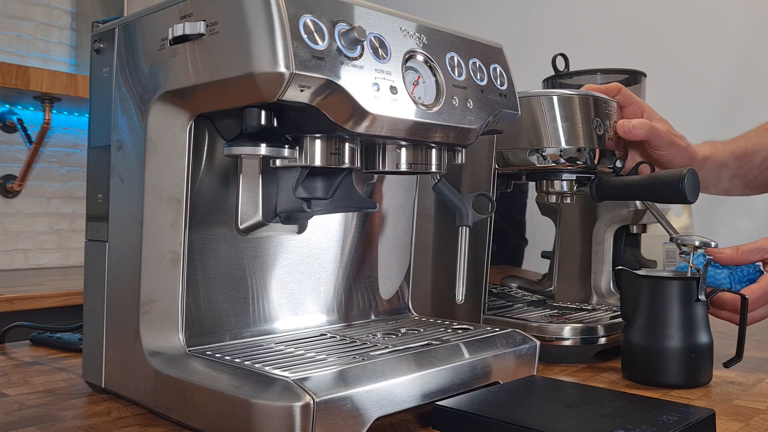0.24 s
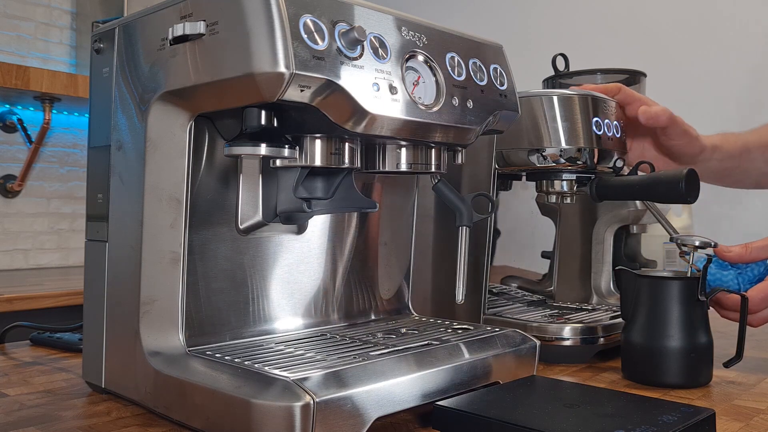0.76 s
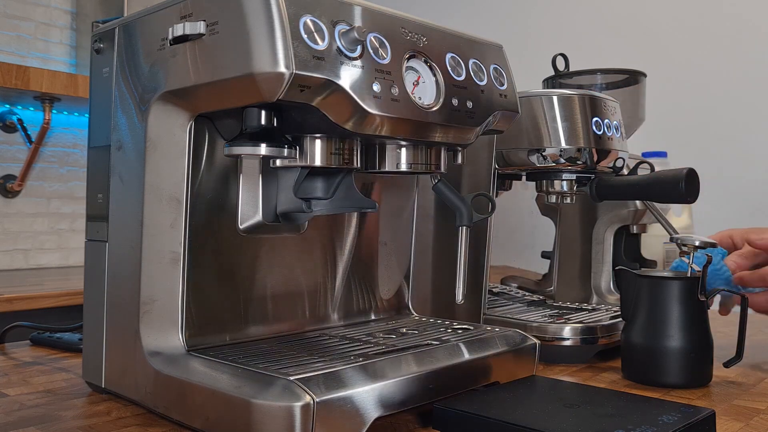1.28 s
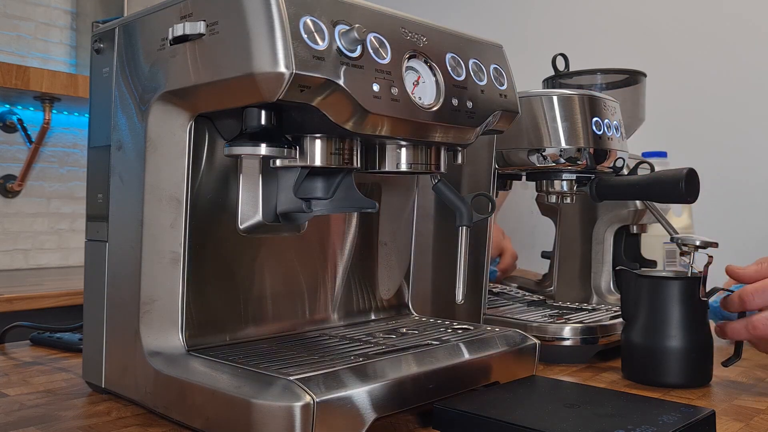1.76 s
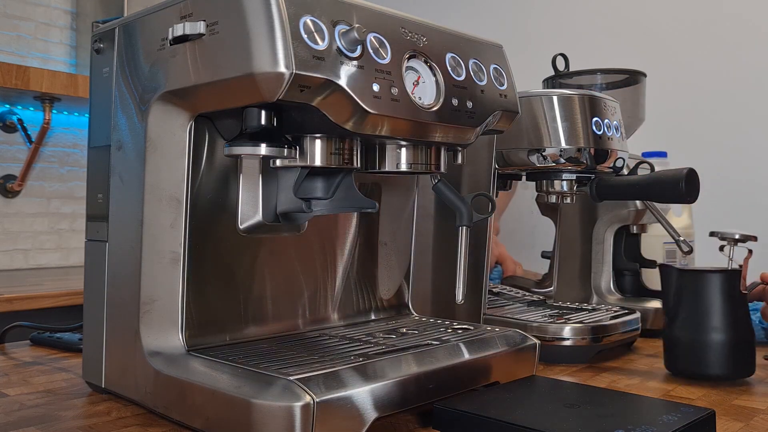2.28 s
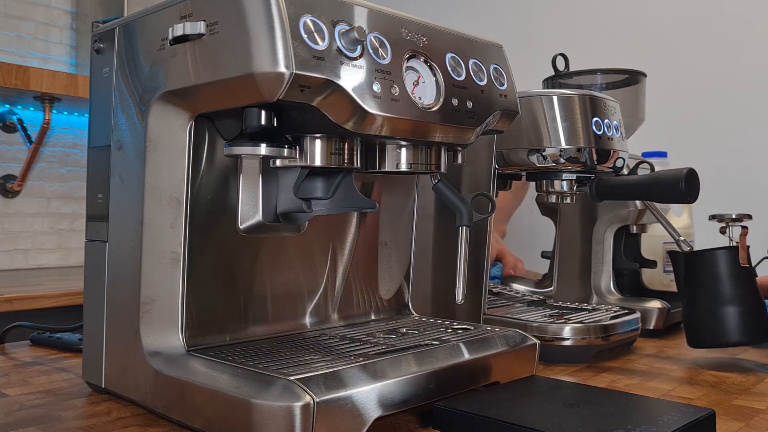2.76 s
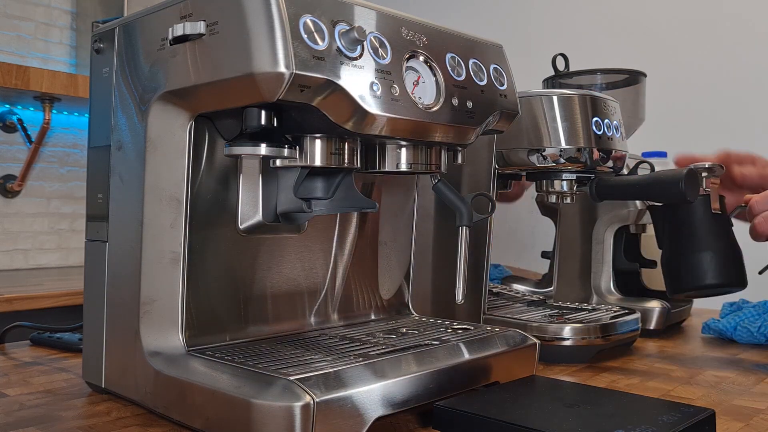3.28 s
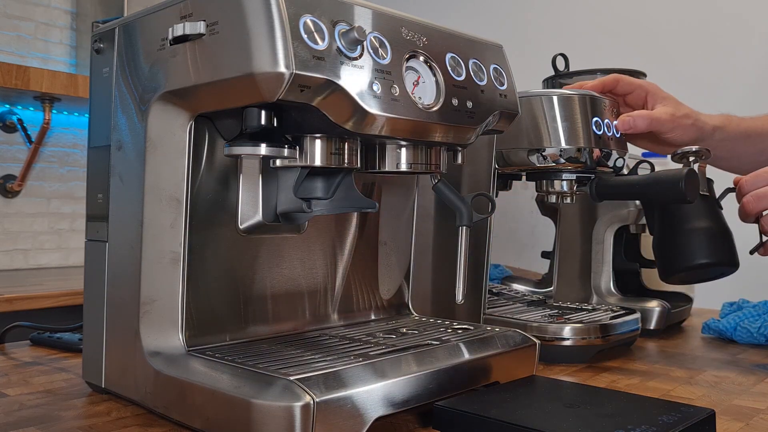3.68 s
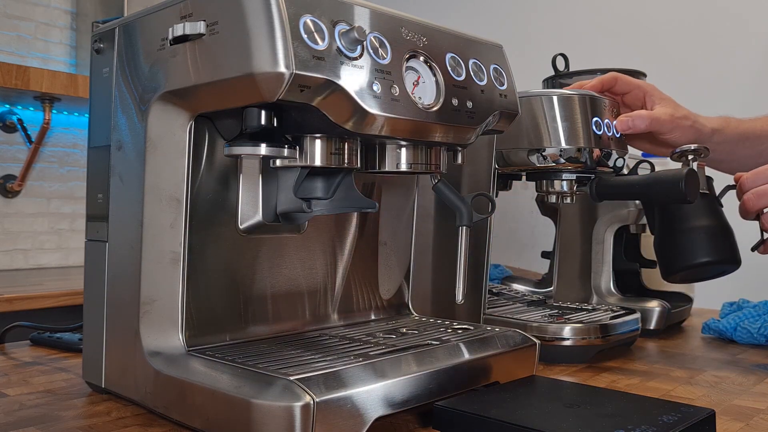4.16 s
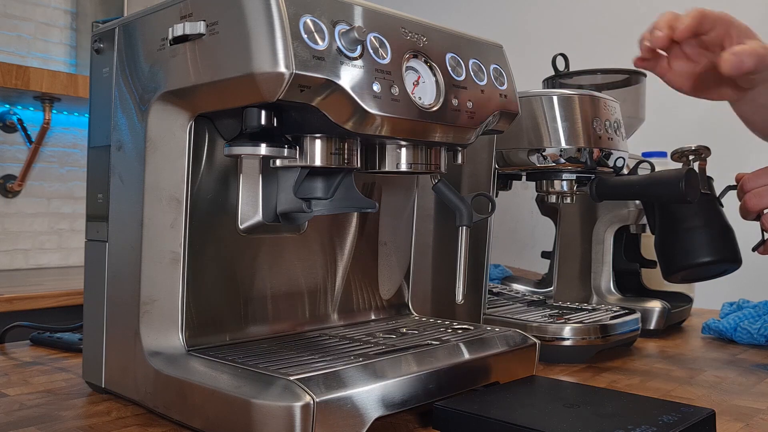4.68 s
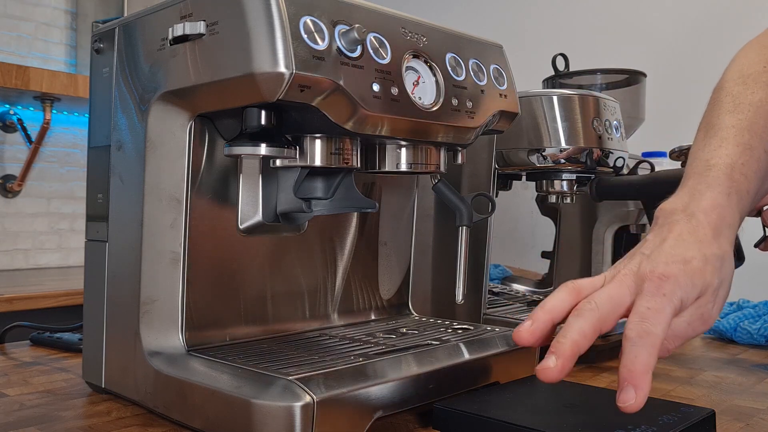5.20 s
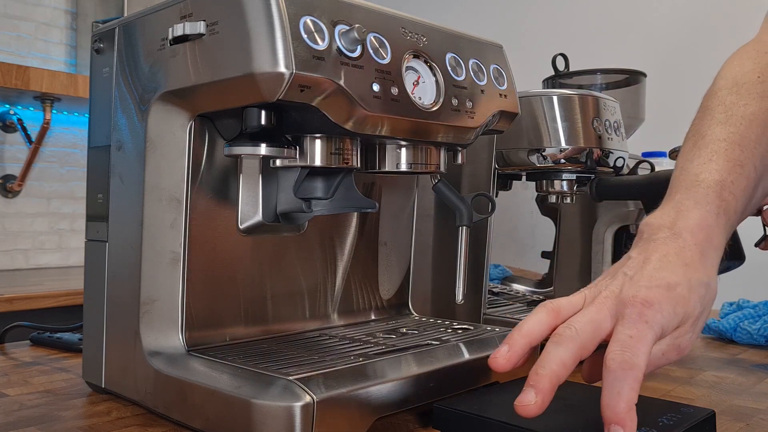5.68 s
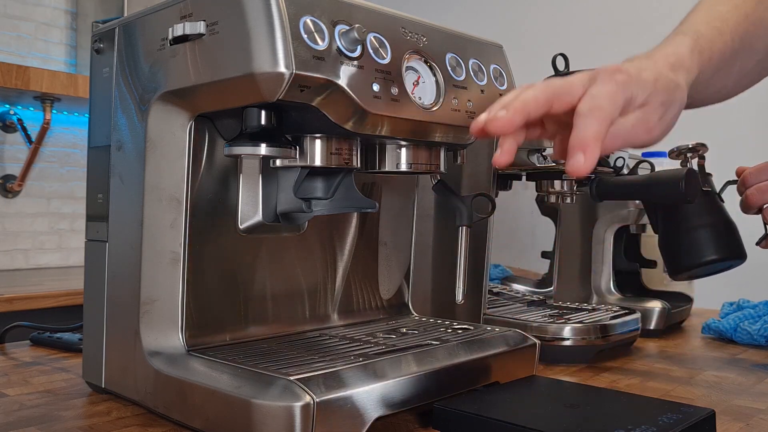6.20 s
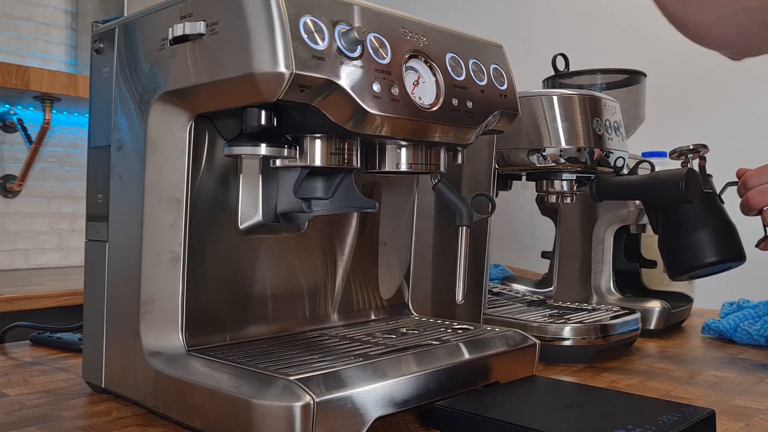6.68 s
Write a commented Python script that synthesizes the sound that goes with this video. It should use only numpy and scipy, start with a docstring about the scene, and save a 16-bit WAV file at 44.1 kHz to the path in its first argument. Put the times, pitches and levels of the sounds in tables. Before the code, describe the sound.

Close stereo sound in a small, short-echoed kitchen, source a little right of centre, over faint low room noise. From 0 s a steam wand hisses into the open, bright and fizzy with a breathy lower rush, sputtering slightly. A firm dull knock hits the wooden counter at 0.6 s; softer bumps follow between 1.1 and 2.2 s. The steam thins steadily from about 1.7 s. A steel jug clinks against the wand at 2.74 s and more faintly at 3.0 s, with a weak hollow tone emerging. Near 3.3 s the hiss is almost gone; at 3.4-3.5 s it spurts back, sliding down and whistling. Inside the jug it stays strong, with a fluttering hoot near 950 Hz, gurgle and overtone flares, the hoot strongest near 4.6 s and weaker after 6.3 s. Dull knocks land at 4.65, 5.73 and 6.8 s. Fizz brightens towards the abrupt end, about 6.9 s.

```python
"""A steam wand hisses into the open and dies down while a steel milk jug is lifted and clinks against it.
The steam returns with a spurt inside the jug, whose hollow sings near 950 Hz; whistles and breaths move in it.
Dull handling knocks sound through the wooden counter of a small kitchen, over faint low noise.
Steam, whistles and hollow are shaped noise; knocks are noise through resonances; clinks are decaying
sine modes plus noise bursts; the hardest contacts are short pulses with a brief modal ring."""
import sys
import numpy as np
from scipy import signal
from scipy.fft import rfft, irfft, next_fast_len
from scipy.io import wavfile
from scipy.ndimage import uniform_filter1d, map_coordinates

SR = 44100
rng = np.random.default_rng(int(sys.argv[2]) if len(sys.argv) > 2 else 0)


def dump(signal):
    """Clip the signal to [-1, 1] and save it as 16-bit WAV at the path in sys.argv[1]."""
    limited = np.clip(np.atleast_2d(signal).T, -1, 1)
    pcm = np.round(limited * 32767).astype(np.int16)
    wavfile.write(sys.argv[1], SR, pcm)


N = 306054


def amp(db):
    """Decibels to gain."""
    return 10 ** (np.asarray(db) / 20)


def unit(x):
    """x at rms 1."""
    return x / np.sqrt(np.mean(x ** 2) + 1e-20)


def along(points, hz):
    """(Hz, value) points interpolated on a log-frequency axis."""
    point_hz, value = np.transpose(points)
    return np.interp(np.log(hz + 1), np.log(point_hz + 1), value)


def clock():
    """Time of every sample in seconds."""
    return np.arange(N) / SR


def curves(rows):
    """One value per sample for each column after the time."""
    time_s, *columns = np.transpose(rows)
    return [np.interp(clock(), time_s, column) for column in columns]


def during(rows):
    """1 over the span of a table, with 25 ms fades outside it."""
    outside_s = np.maximum(rows[0][0] - clock(), clock() - rows[-1][0])
    return np.clip(1 - outside_s / 0.025, 0, 1)


def swell(crest_s, half_s):
    """Smooth bump of height 1 at crest_s, down to 1/e at half_s either side."""
    return np.exp(-((clock() - crest_s) / half_s) ** 2)


def wobble(rate_hz, size=N):
    """Smooth random curve with rate_hz knots a second."""
    knots = rng.standard_normal(int(size * rate_hz / SR) + 4)
    return map_coordinates(knots, [np.arange(size) / SR * rate_hz])


def filtered(x, response):
    """x filtered by a response given as a function of frequency in Hz."""
    size = next_fast_len(N + SR // 2)
    return irfft(rfft(x, size) * response(np.fft.rfftfreq(size, 1 / SR)), size)[..., :N]


def noise(spectrum):
    """Noise of rms 1 with the given colour."""
    return unit(filtered(rng.standard_normal(N), lambda hz: amp(along(spectrum, hz))))


def resonances(modes, hz):
    """Complex sum of (Hz, width Hz, dB) resonances with alternating sign."""
    total = 0
    for k, (mode_hz, width_hz, level_db) in enumerate(modes):
        damping = 1j * hz * width_hz
        total = total + (-1) ** k * amp(level_db) * damping / (mode_hz ** 2 - hz ** 2 + damping)
    return total


def mode_power(modes, hz):
    """Summed power of resonances, without interference between them."""
    return sum(abs(resonances([mode], hz)) ** 2 for mode in modes)


def band(hz, low_hz, high_hz, order):
    """Band-pass gain with smooth edges."""
    low_edge = 1 + (low_hz / (hz + 1)) ** (2 * order)
    high_edge = 1 + (hz / high_hz) ** (2 * order)
    return 1 / np.sqrt(low_edge * high_edge)


def plume(spectrum, near_db, loose):
    """Spread-out jet: a compact core, plus eddies that reach each channel on their own."""
    core = kitchen(noise(spectrum), near_db=near_db, tail_db=-2)
    return core + loose * np.array([noise(spectrum), noise(spectrum)])


# colour of the jet in the open: hz, level_db (dB per Hz)
OPEN_COLOUR = [(500, -26), (1000, -16), (1500, -16.5), (2000, -10.5), (2800, -5.5), (4200, -3),
               (5100, -5.5), (6800, -4.5), (7700, 1.5), (9500, -4), (11300, 0), (13400, 2), (14300, 2),
               (15100, -25)]


def open_jet():
    """Free turbulence of the steam outside the jug."""
    return plume(OPEN_COLOUR, near_db=-8, loose=0.7)


# depth of the random uneven gain: hz, depth_db
PATCH_DEPTH = [(1000, 2), (2500, 1.8), (4300, 4), (8000, 1.6), (13000, 2.3)]


def patchy(x):
    """Random uneven gain over frequency and time, in patches about 170 Hz by 50 ms."""
    cells = signal.stft(x, nperseg=512)[2]
    field = rng.standard_normal(cells.shape[1:])
    field = uniform_filter1d(field, size=2, axis=0)
    field = uniform_filter1d(field, size=9, axis=1)
    depth_db = along(PATCH_DEPTH, np.fft.rfftfreq(512, 1 / SR))[:, None]
    return signal.istft(cells * amp(depth_db * unit(field)), nperseg=512)[1][:, :N]


# colour of the jet in the jug: hz, level_db (dB per Hz)
ENCLOSED_COLOUR = [(600, -23), (1000, -53), (1400, -5.5), (2000, -1), (3000, 0), (4500, -5), (5200, -7.5),
                   (6400, -6), (6800, -6), (7600, 0.5), (8600, -5.5), (9400, -1.5), (10200, -2.5),
                   (11200, 2.5), (12700, 7), (14200, 5), (15000, -16)]
# narrow jug resonances: hz, width_hz, level_db (against the plain hiss)
WALL_MODES = [(2335, 60, 2), (2640, 63, 0), (3120, 110, -1), (3570, 40, 4), (4010, 71, 3), (4290, 20, -5),
              (4730, 70, 2), (5850, 79, 1), (6500, 60, 7), (7700, 100, -11), (8100, 50, 7), (8800, 40, -7),
              (8930, 120, 2.5), (11440, 80, -2)]


def enclosed_jet():
    """Steam inside the jug, coloured by narrow resonances."""
    stream = plume(ENCLOSED_COLOUR, near_db=-4, loose=0.7)
    return patchy(filtered(stream, lambda hz: np.sqrt(1 + mode_power(WALL_MODES, hz))))


# brief spurts of steam: crest_s, fizz_gain_db, half_s
STEAM_SPURTS = [(0.603, 1.5, 0.045), (0.872, 3.5, 0.068), (1.091, 5.5, .025), (1.38, 5, 0.086),
                (1.718, 4.5, 0.12), (2.706, 8.5, 0.028), (3.498, 14, 0.052), (3.99, 2, 0.077),
                (4.21, 3.5, 0.02), (4.83, 4, 0.045), (5.425, 2.5, 0.051), (5.9, 4.5, 0.044),
                (6.233, 4, 0.14), (6.64, 4.5, 0.04)]


def spurts_db():
    """Level lift in the fizz, in dB, as the steam spurts."""
    return sum(gain_db * swell(crest_s, half_s) for crest_s, gain_db, half_s in STEAM_SPURTS)


# three bands of the jet, before trims: time_s, fizz_db, hiss_db, rush_db
JET_LEVELS = [ (0, -36.5, -42.5, -48), (0.3, -37, -40, -45), (0.55, -32.5, -39.5, -43),
              (0.99, -35.5, -40, -41.5), (1.2, -35, -41.5, -47), (1.7, -39, -42, -51),
              (2.03, -37.5, -45, -51), (2.27, -39.5, -47, -51.5), (2.4, -41.5, -47.5, -53.5),
              (2.7, -45.5, -47.5, -52.5), (2.95, -46.5, -51.5, -54.5), (3.28, -53.5, -54.5, -56.5),
              (3.56, -39, -38.5, -43), (4.75, -37, -38.5, -46.5), (5.25, -38, -35, -44),
              (5.95, -32.5, -34, -44.5), (6.45, -36, -35, -48.5), (6.94, -28.5, -35, -48)]
# nozzle position: time_s, share (power share of the enclosed jet, 0-1)
INSIDE_JUG = [(0, 0), (2.6, 0.14), (3.1, 0.06), (3.6, 1), (6.94, 1)]
# lowest part of the rush: time_s, gain_db
RUSH_BOTTOM = [(2.2, 3.5), (2.42, -2.5), (2.8, 0), (2.96, -12), (3.04, 2.5), (3.4, -0.5)]
# large eddies of the free jet: hz, level_db (dB per Hz)
ROAR_COLOUR = [(120, -37), (250, -4), (500, -2.5), (900, 0), (1500, 2), (2500, 5), (5000, -36)]
SPURT_IN_HISS, SPURT_IN_RUSH = 0.55, 0.32  # share of a spurt's dB


def jet(roar_db=-56, roar_db_per_rush_db=1.58, roar_db_per_bottom_db=3.0):
    """Turbulent steam: fine nozzle fizz, hiss and a lower rush where it strikes something; spurts brighten it."""
    fizz_db, hiss_db, rush_db = curves(JET_LEVELS)
    spurt_db = spurts_db()
    inside = np.clip(curves(INSIDE_JUG)[0], 0, 1)
    bottom_db, = curves(RUSH_BOTTOM)
    both = np.array([open_jet(), enclosed_jet()])
    sputter_db = 0.5 * wobble(14) + 0.5 * wobble(60)  # droplets of condensate unsettle the flow

    def layer(low_hz, high_hz, level_db, pan_db):
        free, enclosed = filtered(both, lambda hz: band(hz, low_hz, high_hz, order=10))
        stream = np.sqrt(1 - inside) * unit(free) + np.sqrt(inside) * unit(enclosed)
        flutter_db = sputter_db + 0.73 * wobble(25)
        return stream * amp(level_db + flutter_db) * amp([[pan_db], [-pan_db]])  # positive pans left

    rush = layer(1110, 5000, level_db=rush_db + SPURT_IN_RUSH * spurt_db + 2.5, pan_db=0.58)
    # the lowest part of the rush follows its own level curve
    bottom = filtered(rush, lambda hz: band(hz, 20, 2450, order=8))
    rush = rush + bottom * (amp(bottom_db) - 1)
    hiss = layer(5340, 10040, level_db=hiss_db + SPURT_IN_HISS * spurt_db, pan_db=-0.06)
    fizz = layer(10700, 16000, level_db=fizz_db + spurt_db, pan_db=-1.2)
    # a strong free jet also sheds large, slow eddies
    eddy_db = roar_db + roar_db_per_rush_db * (rush_db + 42.5) + roar_db_per_bottom_db * bottom_db
    roar = kitchen(noise(ROAR_COLOUR), near_db=-3.5, tail_db=-9.0) * amp(eddy_db) * (1 - inside)
    return roar + rush + hiss + fizz


# drive of the jug's hollow, before trims: time_s, tone_db, gurgle_db
HOLLOW_LEVELS = [(2.58, -95, -79), (2.71, -61, -65), (2.88, -51, -59), (2.96, -64.5, -66),
                 (3.07, -43.5, -60), (3.36, -54, -57.5), (3.62, -43, -46), (4.45, -41, -46),
                 (4.62, -34, -47), (4.9, -37, -48.5), (5.2, -41, -46), (6.2, -41, -51), (6.42, -50, -64.5),
                 (6.94, -49, -62)]
# air resonances of the jug: hz, width_hz, level_db
TONE_MODES = [(933, 14.4, 10), (967, 9.9, 12), (1001.5, 5.8, 10.5), (1030, 10, -10), (1085.6, 11.6, 5.5),
              (1118, 23, -7), (880, 250, -4)]
# lower gurgling resonances: hz, width_hz, level_db
GURGLE_MODES = [(650, 490, -10.5), (625.5, 13, -1.5), (702, 10, -6.5), (796, 36, 4.5), (864, 15.4, 10)]
# overtone of the hollow: hz, width_hz, level_db
OVERTONE_MODES = [(1715, 10, 0)]
# moments when the overtone catches, before trims: crest_s, level_db
OVERTONE_FLARES = [(3.04, -57.5), (3.72, -44), (3.92, -47), (4.11, -47.5), (4.37, -51), (4.73, -67),
                   (5.28, -46), (5.37, -45), (5.67, -48), (5.87, -53), (6.03, -53), (6.17, -46), (6.4, -54),
                   (6.53, -51)]
FLARE_HALF_S, OVERTONE_DB = 0.057, -16  # OVERTONE_DB: against the tone, between flares


def hollow(slosh_depth_db=1.1, flicker_db=0.5, flutter_db=0.84):
    """The jet blows the air in the jug into a fluttering, hooting tone whose overtone flares now and then."""
    tone_db, gurgle_db = curves(HOLLOW_LEVELS)
    flares = sum(amp(level_db) * swell(crest_s, FLARE_HALF_S) for crest_s, level_db in OVERTONE_FLARES)
    overtone_gain = amp(tone_db + OVERTONE_DB) + flares
    slosh_db = slosh_depth_db * wobble(13) + flutter_db * wobble(45)

    def blown(modes, low_hz, high_hz, level_db):
        response = lambda hz: np.sqrt(mode_power(modes, hz)) * band(hz, low_hz, high_hz, order=8)
        mid, side = filtered(rng.standard_normal((2, N)), response)
        spread = 0.94
        stereo = np.array([mid + spread * side, mid - spread * side])
        return unit(stereo) * amp(level_db + slosh_db)

    tone = blown(TONE_MODES, 790, 1400, level_db=tone_db + 1.5) * amp([[-0.4], [0.4]])
    gurgle = blown(GURGLE_MODES, 614, 940, level_db=gurgle_db + 3.0) * amp([[1.5], [-1.5]])
    overtone = blown(OVERTONE_MODES, 1470, 2060, level_db=flicker_db * wobble(38) + 2.5) * overtone_gain
    return (tone + gurgle + overtone) * during(HOLLOW_LEVELS)


# moving noise bands in the steam, narrow whistles and broad breaths, one a row of points, before trims:
# time_s, centre_hz, width_hz, level_db
MOVING_BANDS = [
    [(0, 6540, 895, -48), (0.16, 7940, 1010, -41.5), (0.29, 8940, 1100, -46)],
    [(0.28, 6130, 1507, -50), (0.58, 5590, 1514, -48), (0.8, 3687, 2210, -51), (0.98, 3007, 2682, -42),
     (1.07, 2494, 2190, -55)],
    [(3.21, 4680, 450, -64), (3.28, 4110, 500, -54), (3.355, 3920, 701, -55), (3.38, 3200, 902, -51),
     (3.4, 2144, 605, -43.5), (3.445, 1875, 345, -56)],
    [(3.22, 6220, 600, -67), (3.36, 6130, 700, -56), (3.4, 5400, 1210, -52), (3.44, 5050, 895, -54)],
    [(3.48, 5710, 454, -43), (3.52, 5810, 385, -36.5), (3.56, 5800, 317, -43)],
    [(3.8, 5640, 603, -51), (4.35, 6010, 601, -45.5), (4.66, 6180, 600, -50)],
    [(4.9, 4730, 500, -64), (5.45, 4510, 900, -50.5), (6.2, 4695, 703, -52.5), (6.94, 4700, 499, -59.5)],
    [(3.6, 7980, 299, -58), (4.06, 7800, 281.6, -44), (5.1, 7880, 257.5, -48), (5.45, 7730, 380, -43),
     (5.95, 7800, 381.5, -40.5), (6.8, 7480, 506.5, -44.5)],
    [(3.6, 10640, 944, -44), (4.1, 10880, 942, -40.5), (4.7, 10760, 954, -45)],
    [(5.4, 2100, 500, -55), (5.65, 2408, 624, -46.5), (5.95, 2427, 558, -49.5), (6.3, 2650, 800, -44),
     (6.42, 3086, 1747, -44), (6.94, 3288, 1963, -43.5)],
]


def whistles(level_db=3.5, flutter_db=0.6, skirt=0.39, skirt_width=2.6, stagger=0.1):
    """Moving noise bands in the steam, narrow whistles and broad breaths, slide, widen, swell and fade."""
    out = np.zeros(N)
    for glide in MOVING_BANDS:
        fade = during(glide)
        live = fade > 0
        centre_hz, width_hz, glide_db = np.array(curves(glide))[:, live]
        turnover = np.cumsum(abs(width_hz)) / SR  # faster eddies make a wider band
        # two envelopes in quadrature, each a narrow core on a wider skirt
        in_phase, quadrature = [
            map_coordinates(core, [turnover]) + skirt * map_coordinates(edge, [skirt_width * turnover])
            for core, edge in rng.standard_normal((2, 2, SR))]
        ragged_hz = centre_hz + stagger * width_hz * wobble(55, size=len(centre_hz))
        phase = 2 * np.pi * np.cumsum(ragged_hz) / SR
        breath = unit(in_phase * np.cos(phase) + quadrature * np.sin(phase))
        out[live] += breath * amp(glide_db) * fade[live]
    out *= amp(level_db + flutter_db * wobble(30))
    airy = filtered(out, lambda hz: band(hz, 1500, 18000, order=6))  # keeps the bands above about 1500 Hz
    return kitchen(airy, near_db=-5, tail_db=2)


# jug against wand: start_s, level_db, hardness_db_per_octave, ring_length_factor, tick_db
CLINK_EVENTS = [(2.739, -28, -0.5, 1.07, -13), (2.998, -35, 4, 0.69, -2)]
# steel modes of the jug, before hardness and ring length: hz, level_db, t60_s
STEEL_MODES = [(301.6, -12, 0.29), (891, 1, 0.11), (994, -2.5, 0.13), (1082, -3.5, 0.11), (1745, -21, 0.25),
               (1960, -12, 0.31), (2330, -14, 0.13), (2700, -7, 0.17), (2830, -1.5, 0.36), (3080, -13, .12),
               (3470, -5, 0.16), (3620, -14, .15), (4620, -18, 0.36), (5400, -19, .14), (6460, -20, .12),
               (8100, -8, 0.085)]
# contact crack: hz, level_db (dB per Hz)
CRACK_COLOUR = [(80, -45), (300, -17), (800, 1.5), (1150, 12), (1600, -18), (2300, 4.5), (3100, 9.5),
                (4200, -12), (6000, -23), (15000, -26)]
# contact tick: hz, level_db (dB per Hz)
TICK_COLOUR = [(800, -21), (2500, -17), (3600, 1), (6500, -3), (8500, -3), (11000, -6), (15000, -22)]


def clinks(ring_db=-1.5, crack_db=3.5, crack_t60_s=0.056, tick_t60_s=0.1, rattle_rad=0.52):
    """Two touches ring the steel modes with crack and tick; hardness tilts the modes, rattling blurs them."""
    out = np.zeros(N)
    t = np.arange(SR) / SR
    for start_s, level_db, hardness_db, ring_length, tick_db in CLINK_EVENTS:
        ring = np.zeros(SR)
        for hz, mode_db, t60_s in STEEL_MODES:
            struck_db = mode_db + hardness_db * np.log2(hz / 1500) + rng.normal(0, 1)
            phase = 2 * np.pi * hz * t + rattle_rad * wobble(201, size=SR)
            ring += amp(struck_db - 60 * t / (t60_s * ring_length)) * np.sin(phase)
        crack = noise(CRACK_COLOUR)[:SR] * amp(crack_db - 60 * t / crack_t60_s)
        tick = noise(TICK_COLOUR)[:SR] * amp(tick_db - 60 * t / tick_t60_s)
        onset = 1 - np.exp(-t / 0.00066)
        out[round(start_s * SR):][:SR] += amp(level_db) * (amp(ring_db) * ring + crack + tick) * onset
    thin_steel = signal.butter(2, 180, "high", fs=SR, output="sos")  # thin steel radiates no bass
    return kitchen(signal.sosfilt(thin_steel, out), near_db=-6, tail_db=-7)


# knocks on the counter, before trims: crest_s, level_db, bass_db, bright_edge_db, rise_s
KNOCK_EVENTS = [(0.617, -30, 2, 14.5, 0.056), (0.78, -58, 2, -5, 0.024), (1.15, -44.5, -11, 12, 0.045),
                (1.33, -50.5, -13, 10, 0.05), (1.65, -43.5, -11, -5, 0.025), (1.899, -39, -16, 1, 0.03),
                (2.07, -43.5, -9, 8, 0.067), (2.149, -40.5, -6, 14.5, 0.05), (2.77, -46, -7, 8, 0.035),
                (3.44, -55.5, -20, 19, 0.075), (4.585, -51, 10, -10, 0.028), (4.655, -28, -1, 4.5, 0.04),
                (5.73, -30, -0.5, 6, 0.041), (5.82, -41, 2, -2, 0.016), (6.815, -30, -2, 8, 0.045)]
# deep modes of the counter: hz, width_hz, level_db
COUNTER_MODES = [(81.5, 20, -6), (106, 19, -5), (152.4, 10, -1), (214.5, 31, -3.5), (258.4, 18, -0.5)]
# middle modes of what stands on it, also rung by blows(): hz, width_hz, level_db
WORKTOP_MODES = [(278, 60, -3), (342, 45, 1.5), (383, 43, 0.5), (429, 32, -5.5), (470, 22, -5.5),
                 (519, 29, -6)]
# bright edge of a knock: hz, level_db (dB per Hz)
EDGE_COLOUR = [(200, -31), (400, -1.5), (580, 1.5), (830, 0), (1100, -4.5), (1700, -10.5), (4000, -22)]
COUNTER_T60_S, WORKTOP_T60_S = 0.56, 0.43
SHUDDER_T60_S, SHUDDER_DB = 1, -28  # weaker, slower deep shudder


def knocks(edge_db=-7, edge_t60_s=0.33, level_db=-11):
    """Soft tumbles of contacts; bass-heavy ones boom in the counter, which shudders on after the bright edge."""
    push, weight, edge = np.zeros((3, N))
    for crest_s, knock_db, bass_db, bright_db, rise_s in KNOCK_EVENTS:
        t = clock() - crest_s
        force = amp(knock_db) * np.clip(1 + t / rise_s, 0, 1) ** 0.55
        dying = lambda t60_s: amp(-60 * np.maximum(t - 0.02, 0) / t60_s)
        shudder = amp(bass_db + SHUDDER_DB) * dying(SHUDDER_T60_S)
        push += force * dying(WORKTOP_T60_S)
        weight += force * (amp(bass_db) * dying(COUNTER_T60_S) + shudder)
        edge += force * amp(bright_db) * dying(edge_t60_s)
    contacts = rng.standard_normal(N) * amp(0.52 * wobble(120))

    def rung(modes, force):
        response = lambda hz: resonances(modes, hz) * band(hz, 105, 470, order=6)
        struck, steady = filtered(np.array([contacts * force, contacts]), response)
        return struck / np.std(steady)

    boom = rung(COUNTER_MODES, weight) + rung(WORKTOP_MODES, push)
    scuff = amp(edge_db) * edge * unit(noise(EDGE_COLOUR) * amp(1.8 * wobble(150)))
    boom_in_room = kitchen(boom, near_db=-11.5, tail_db=-20.0)
    scuff_in_room = kitchen(scuff, near_db=-1.0, tail_db=-20.0)
    return amp(level_db) * (boom_in_room + scuff_in_room)


# hard contacts within the knocks: crest_s, peak_db, contact_s (time scale of the push)
HARD_CONTACTS = [(0.601, -24, 0.00051), (0.621, -38, 0.0007), (0.642, -25, 0.00074), (2.148, -30, 0.00054),
                 (4.62, -30, 0.0007), (4.659, -32, 0.0011), (5.741, -32, 0.00092), (5.816, -33, 0.0014),
                 (6.822, -30, 0.001)]


def blows(ring_db=-12, ring_t60_s=0.13):
    """The hardest contacts within the knocks: one short push each, and a brief ring of the worktop modes."""
    out = np.zeros(N)
    for crest_s, peak_db, contact_s in HARD_CONTACTS:
        t = clock() - crest_s
        u = t / contact_s
        out += amp(peak_db) * (1 - 2 * u ** 2) * np.exp(-u ** 2)
        live = (t > 0) & (t < 0.5)
        age_s = t[live]
        ring = sum(amp(mode_db) * np.sin(2 * np.pi * hz * age_s) for hz, _, mode_db in WORKTOP_MODES)
        out[live] += amp(peak_db + ring_db - 60 * age_s / ring_t60_s) * ring / 2
    high_pass = signal.butter(4, 130, "high", fs=SR, output="sos")  # keeps the pulses above about 130 Hz
    return kitchen(signal.sosfilt(high_pass, out), near_db=-15, tail_db=-14)


# level of the low noise: time_s, level_db
LOW_NOISE_LEVELS = [(0, -71), (1, -63.5), (2.2, -71), (2.38, -95), (2.58, -75), (3.4, -69), (3.7, -74.5),
                    (4.5, -68.5), (5.0, -57), (5.5, -70.5), (6.1, -69), (6.5, -76)]
# colour of the low noise: hz, level_db (dB per Hz)
LOW_NOISE_COLOUR = [(25, -28), (60, -14), (100, -6.5), (150, -2), (200, -3.5), (245, 8), (290, -3),
                    (380, -2), (500, 1.5), (1200, -28), (4000, -18)]


def ambience():
    """Faint low noise on a typed level curve: room murmur and the low remains of knocks."""
    low_noise = kitchen(noise(LOW_NOISE_COLOUR), near_db=-10.0, tail_db=-11.5)
    return amp(curves(LOW_NOISE_LEVELS)[0]) * low_noise


# room decay: hz, t60_s
ROOM_DECAY = [(200, 0.16), (2000, 0.23), (12000, 0.038)]


def kitchen(x, near_db, tail_db, lag_s=0.00017):
    """Source right of centre: direct sound, glances off nearby steel and tiles, then the room's tail."""
    hz, t, cells = signal.stft(rng.standard_normal((2, SR // 2)), SR, nperseg=256)
    decay = amp(-60 * t / along(ROOM_DECAY, hz)[:, None])
    tail = signal.istft(cells * decay, SR, nperseg=256)[1]
    age_s = np.arange(tail.shape[1]) / SR
    glances = rng.standard_normal(tail.shape) * amp(-60 * age_s / 0.12) * (age_s > 0.002)
    echoes = amp(near_db) * glances / np.linalg.norm(glances[0])
    echoes += amp(tail_db) * tail / np.linalg.norm(tail[0])
    echoes[0, round(abs(lag_s) * SR)] += 1  # direct sound reaches the left channel later
    echoes[1, 0] += 1
    return signal.fftconvolve(x[None], echoes / np.linalg.norm(echoes[0]), axes=1)[:, :N]


def scene():
    """Steam, jug, counter and low noise together."""
    return jet() + hollow() + whistles() + clinks() + knocks() + blows() + ambience()


TOP_HZ = 15150


def record(dry):
    """Band limit: nothing is kept from TOP_HZ up."""
    return filtered(dry, lambda hz: hz < TOP_HZ)


dry = scene()
out = record(dry)
dump(out)
```